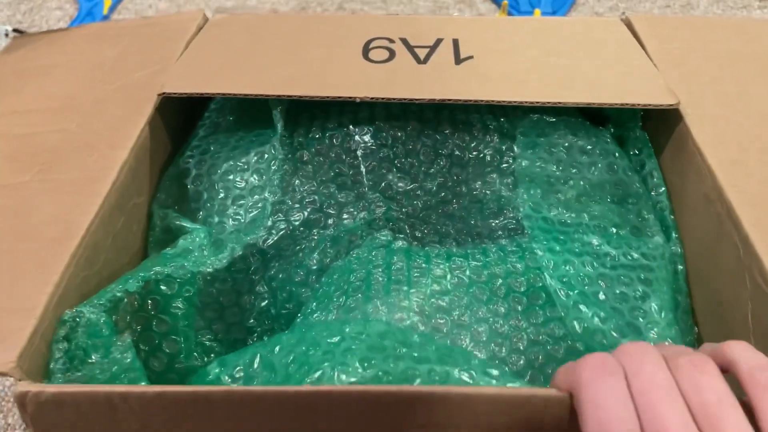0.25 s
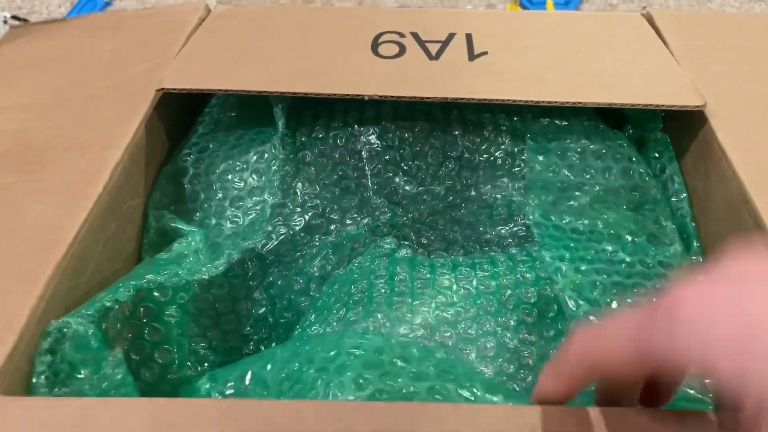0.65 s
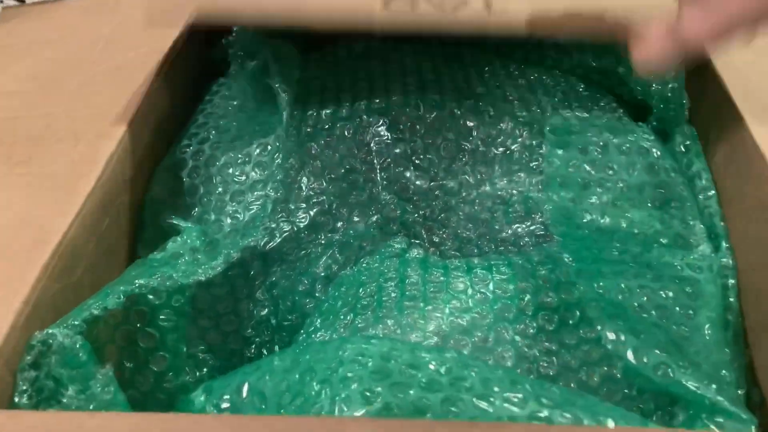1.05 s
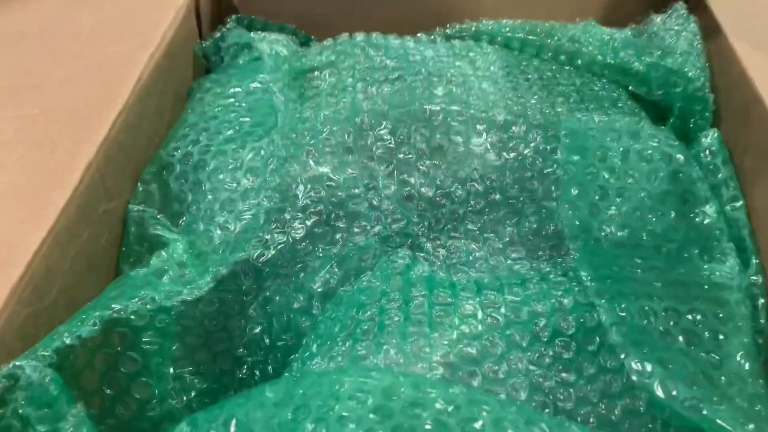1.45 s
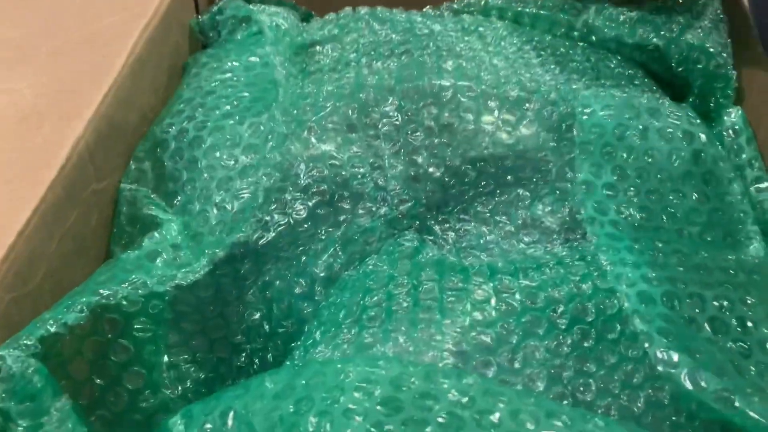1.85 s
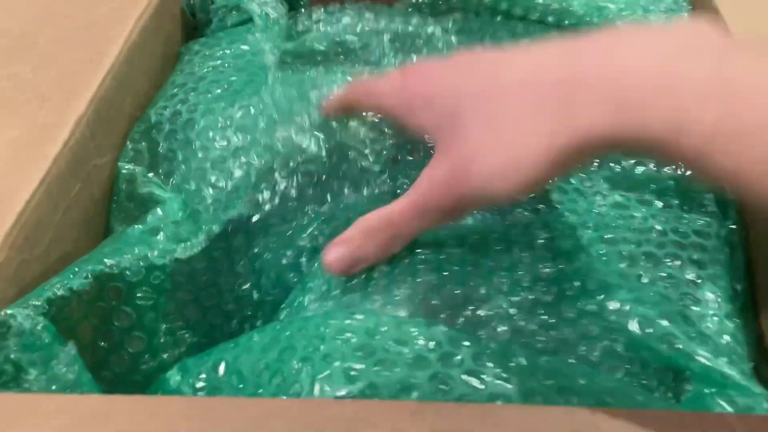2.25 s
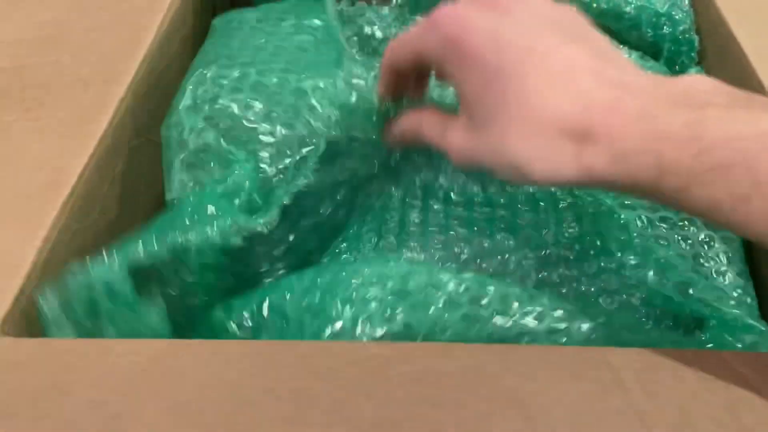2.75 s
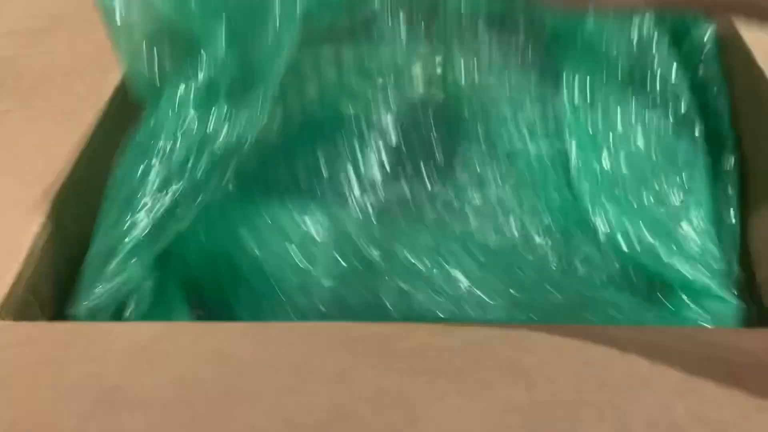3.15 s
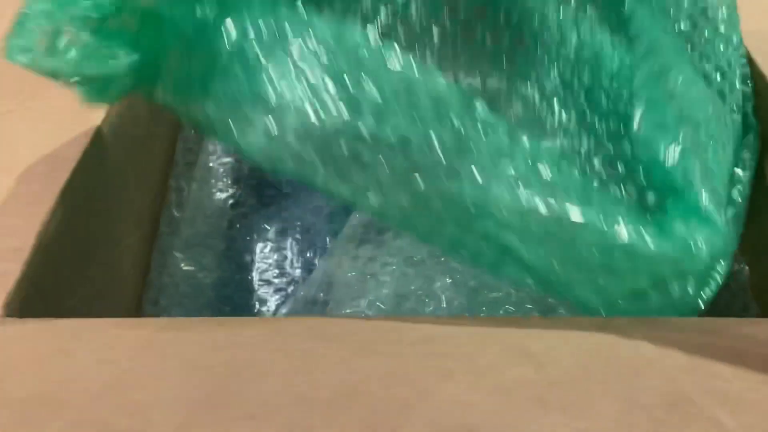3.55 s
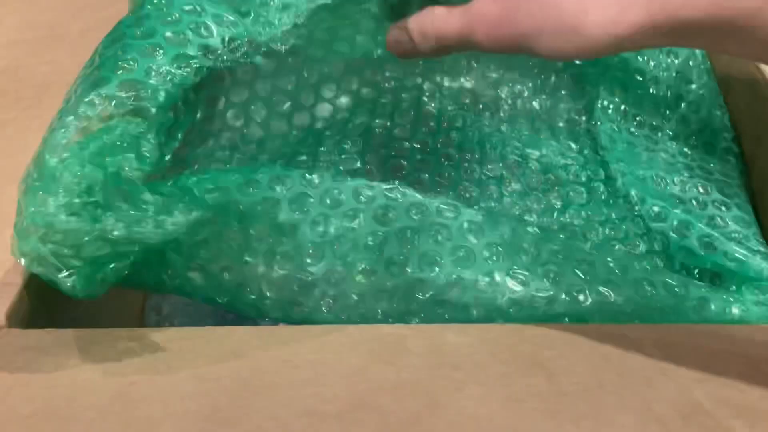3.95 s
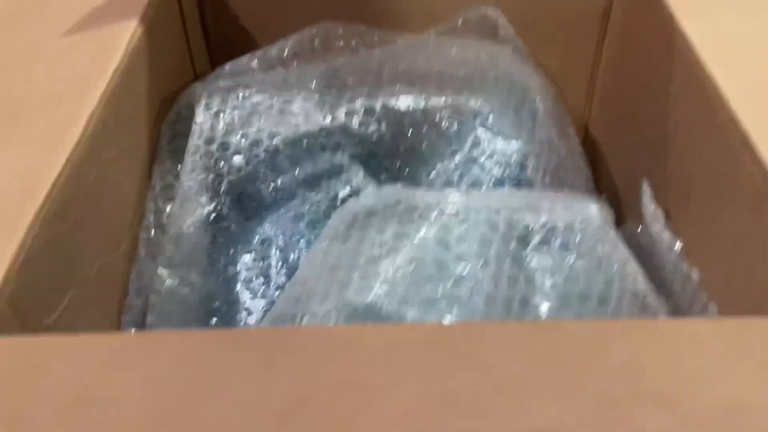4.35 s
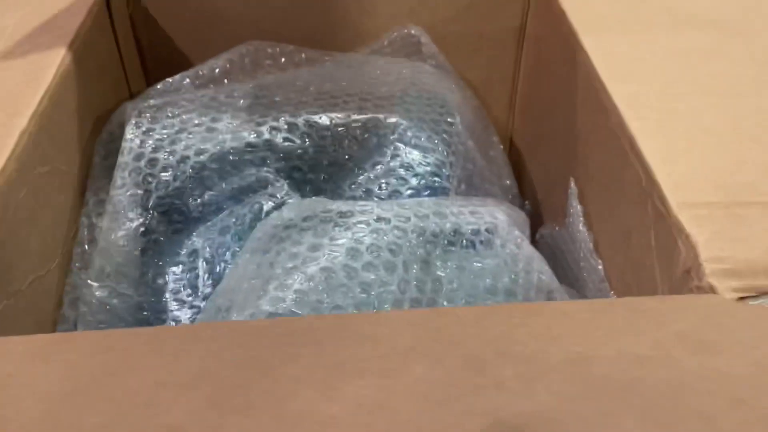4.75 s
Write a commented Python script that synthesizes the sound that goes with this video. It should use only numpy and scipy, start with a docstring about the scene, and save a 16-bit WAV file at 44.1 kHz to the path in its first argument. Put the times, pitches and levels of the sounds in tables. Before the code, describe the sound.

Bubble wrap crackles lightly in a box, a cardboard flap thuds and scrapes, then the sheet is dragged out in loud, bright crinkling bursts.

```python
"""A hand nudges bubble wrap, folds back the flap of a cardboard box, drags the sheet out and flings it aside.
First the film ticks and snaps: random clicks through a bank of bands, plus single coloured cracks.
The flap then thuds (struck modes), scrapes (stick-slip clicks) and hisses under the palm (noise).
The drag and the fling are the loudest film; the sheet settles, then a soft blow and scrape of the box follow.
A small, softly furnished room answers throughout; something hums far off."""
import sys
import numpy as np
from scipy import signal
from scipy.fft import rfft, irfft
from scipy.io import wavfile
from scipy.ndimage import uniform_filter1d

SR = 44100
rng = np.random.default_rng(int(sys.argv[2]) if len(sys.argv) > 2 else 0)


def master(y):
    """Save y as 16-bit WAV."""
    cut = np.clip(np.atleast_2d(y).T, -1, 1)
    pcm = np.round(cut * 32767)  # scale
    wavfile.write(sys.argv[1], SR, pcm.astype(np.int16))


N = 221161
T = np.arange(N) / SR
BANDS_HZ = 2 ** np.arange(5.25, 14.1, 1 / 3)

# room air, relative spectrum: (frequency [Hz], density [dB per Hz])
ROOM_SPECTRUM = [(30, -25), (60, -2), (120, -3), (200, -10), (400, -37), (1000, -18), (4000, -18),
                 (16000, -30)]
# film clicks, relative spectrum: (frequency [Hz], density [dB per Hz])
FILM_SPECTRUM = [(30, -21), (60, -6.5), (110, 5.5), (170, -5), (260, 4), (340, -6), (500, 0.5), (760, -4),
                 (1230, 1), (1750, -2), (3600, -3), (9000, -8.5), (12500, -14.5), (16000, -16)]
# rubbing card, relative spectrum: (frequency [Hz], density [dB per Hz])
CARD_SPECTRUM = [(30, -21), (65, 2.5), (180, -7), (260, 7.5), (350, 0), (750, 2), (1300, -3), (1900, -20),
                 (5000, -20), (12000, -30)]
# palm hiss, relative spectrum: (frequency [Hz], density [dB per Hz])
PALM_SPECTRUM = [(600, -7), (1200, -5), (1800, -10), (2600, 2), (3400, -6.5), (4400, -2), (5600, -3),
                 (7000, -3), (10000, -2), (14500, -1.5), (16000, -2)]
# modes of box and flap: (nominal frequency [Hz], relative level [dB], t60 [s])
BOX_MODES = [(66.4, -21, 0.14), (105, -8.5, 0.11), (223, 1.5, 0.052), (321.3, 1.5, 0.13), (368, 1, 0.052),
             (420, 1.5, 0.056), (495.6, 2.5, 0.039), (576.6, 5.5, 0.093), (699.7, -11, 0.035),
             (752, -1, 0.073), (870, 5.5, 0.043), (1200, 9, 0.065), (1430, 11, 0.035)]
# blows on the box: (time [s], dry peak [dB], contact, at least 0.0002 in use [s])
BLOW_EVENTS = [(0.321, -37, 0.0056), (.432, -41.5, 0.006), (0.986, -36, 0.0082), (1.054, -29, 0.014),
               (1.067, -38, 0.0018), (1.08, -38, 0.0022), (1.372, -27, 0.0026), (1.3873, -14.5, 0.001),
               (1.423, -28.5, 0.00095), (1.491, -38, 0.0017), (1.8393, -38, 0.0001),
               (1.987, -38.5, 0.00041), (2.022, -35.5, 0.00094), (2.106, -43, 0.00025),
               (4.837, -64, 0.0096)]
# card rubbing on card: (time [s], held [s], level [dB], panel rumble before its boost [dB re level])
SCRAPE_STROKES = [(.985, 0.014, -54, 9), (1.057, 0.011, -45, 1), (1.11, .25, -66.5, 11.5),
                  (1.39, 0.034, -41.5, -2), (1.48, 0.097, -53, 7.5), (1.609, 0.054, -40.5, -5),
                  (1.894, 0.048, -46, 1), (1.97, 0.017, -51, -4), (2.027, 0.0085, -53, -5),
                  (2.068, 0.0069, -50, 3), (2.11, 0.017, -53, -17), (4.78, .012, -55, -7),
                  (4.825, 0.022, -68.5, 19)]
# palm sliding along the flap: (time [s], held [s], level [dB])
PALM_STROKES = [(1.045, 0.376, -54), (1.065, 0.0095, -54)]
# creases snapping at set times: (time [s], dry peak [dB], pitch [Hz], width, half the 1/e distance [octaves])
SNAP_EVENTS = [(0.1387, -32.5, 6300, 1.1), (0.2486, -31, 3150, 0.6), (0.4384, -28, 4800, .9),
               (0.4792, -16.5, 1830, 0.67), (0.496, -20.5, 3993, 0.76), (0.6635, -28, 4500, 1.7),
               (0.7638, -33.5, 5300, 0.96), (0.8361, -38.5, 4930, 0.82), (0.8705, -38, 3095, .56),
               (0.8904, -40.5, 4010, 0.4), (1.073, -32.5, 1950, 0.72), (1.3862, -18.5, 2600, 0.45),
               (1.3888, -17, 2940, 0.32), (1.4269, -32, 2890, 2.15), (1.4843, -28, 4700, 0.89),
               (1.561, -27.5, 5100, 0.59), (1.6005, -27.5, 2213, 1.08), (1.6549, -18, 3600, 1.2),
               (1.6714, -16.5, 7000, 0.92), (1.7457, -37, 8300, 0.29), (1.838, -17.5, 8690, 0.65),
               (1.9529, -30.5, 3886, 0.85), (1.971, -33, 3530, 0.77), (2.0245, -30.5, 3600, 0.61),
               (2.0315, -32.5, 3600, 0.74), (2.1062, -28, 4673, 1.3), (2.125, -36, 2804, 0.52),
               (2.1685, -27, 4700, 1), (2.4415, -17, 4470, 1.4), (2.971, -18, 6301, 0.72),
               (3.208, -17.5, 5609, .64), (3.3354, -26.5, 3000, 0.32), (3.386, -23, 3804, 1.36),
               (3.417, -17, 5647, 0.54), (3.4319, -14.5, 6800, 0.54), (3.4744, -17, 4596, 0.59),
               (3.9936, -22, 3379, 0.94), (4.06, -11, 7400, 0.41)]
# pushes and tugs on the film, from the first nudges through the fling to the sheet settling;
# levels precede the gains in wrap():
# (time [s], held [s], level [dB], flapping bass [dB re level], sharp treble [dB re level])
FILM_TUGS = [(0.0, .04, -53, -5.5, -3), (0.08, 0.16, -57, -6.5, -5), (0.25, 0.25, -52, -7.5, -5),
             (0.32, .02, -48, -12, -10), (0.49, 0.018, -43.5, -3.5, -12), (0.555, 0.11, -45, -13, -7),
             (0.88, 0.16, -65, -4, -10), (1.39, .015, -44, -3, -28), (1.489, 0.11, -56, -8, -3),
             (1.655, 0.0079, -43, -7, -5.5), (1.89, 0.18, -57.5, -10, -1), (2.182, 0.028, -46, -5, 1.5),
             (2.227, .04, -36.5, -7, -2.5), (2.345, 0.65, -42, -8, -3.5), (2.4, 0.047, -37.5, -5, -2.5),
             (2.77, .12, -42, -15, -3), (2.96, 0.073, -48, -12, -1.5), (3.06, .2, -39, -8.5, -2),
             (3.125, 0.061, -35.5, -18, -7.5), (3.33, .1, -50, -8.5, -5), (3.49, 0.2, -47.5, -7.5, -6.5),
             (3.41, 0.023, -40, -9.5, -4), (3.58, 0.045, -40, -13.5, -5), (3.78, 0.021, -35, -17, -9.5),
             (3.825, 0.069, -39.5, -13.5, -7), (4.005, .05, -36.5, -13, -0.5), (4.092, .006, -14.5, -8, -4),
             (4.25, .13, -47, -9, -4), (4.33, 0.0084, -40.5, -7.5, -9), (4.5, 0.49, -63, -18.5, -5.5)]

ROOM_DB, HUM_HZ, HUM_PEAK_DB = -65.5, 119.6, -64.5
CARD_RISE_DB_PER_S, CARD_STOP_DB_PER_S = 744, 450
FILM_RISE_DB_PER_S, FILM_SETTLE_DB_PER_S = 600, 205  # tightens quickly, relaxes slowly
SAG_DB_PER_S = 5  # each push eases off while held
BILLOW_LAG_S = 0.0056  # the whole sheet flaps just after its creases move
SHIVER_T60_S = 0.012
# snaps at random times
STRAY_PER_S, STRAY_HZ, STRAY_SCATTER_OCTAVES, STRAY_WIDTH_OCTAVES = 28, 4480, 0.51, 0.84
# peak with the film at -40 dB, its scatter, and how far it follows the film
STRAY_DB, STRAY_SPREAD_DB, STRAY_FOLLOW_DB_PER_DB = -26, 1.5, 0.78
TOP_HZ = 16100


def undb(db):
    """Decibels to gain."""
    return 10 ** (np.asarray(db) / 20)


def colour(spectrum, hz):
    """Gain of a spectrum, interpolated in dB over log frequency."""
    f, db = np.transpose(spectrum)
    return undb(np.interp(np.log(hz + 1), np.log(f), db))


def band(x, lo_hz, hi_hz):
    """Causal band-pass."""
    return signal.sosfilt(signal.butter(2, [lo_hz, hi_hz], "band", fs=SR, output="sos"), x + 1e-18)


def noise(spectrum):
    """Noise of rms 1 with the given spectrum."""
    size = 2 ** 18
    gain = colour(spectrum, np.fft.rfftfreq(size, 1 / SR))
    x = irfft(rfft(rng.standard_normal(size)) * gain)[:N]
    return x / x.std()


def walk(rate_hz):
    """Continuous random drift of spread near 1, with a new target rate_hz times a second."""
    return 1.2 * np.interp(T * rate_hz, np.arange(4096), rng.standard_normal(4096))


def stroke(s, held_s, rise_db_per_s, fall_db_per_s):
    """Gain of one hand movement: builds up to time s, sags while held, then dies away."""
    early = np.maximum(s - T, 0)
    late = np.maximum(T - s - held_s, 0)
    sag_db = SAG_DB_PER_S * np.clip(T - s, 0, held_s)
    return undb(-rise_db_per_s * early - sag_db - fall_db_per_s * late)


def crackle(rate_per_s, spread_db, tint_db, spectrum, steady_s):
    """Random clicks, few large and many small, each with its own mix of bands; a row a band, total rms 1."""
    at = np.flatnonzero(rng.random(N) < rate_per_s / SR)
    size = undb(spread_db * np.minimum(rng.exponential(size=N)[at], 4.6))
    # motion sets the energy over a short stretch, however it splits into clicks
    energy = uniform_filter1d(np.bincount(at, size ** 2, N), int(steady_s * SR))
    size = size / np.sqrt(energy[at])
    weight = colour(spectrum, BANDS_HZ) * np.sqrt(BANDS_HZ)
    rows = []
    for hz, gain in zip(BANDS_HZ, weight / np.linalg.norm(weight)):
        tint, sign = rng.standard_normal((N // 2, 2))[:len(at)].T
        clicks = np.bincount(at, size * np.sign(sign) * undb(tint_db * tint), N)
        ring = band(clicks, hz / 1.17, hz * 1.17)
        rows.append(gain * ring / ring.std())
    return np.array(rows)


def room_tone():
    """Quiet air noise and a distant mains hum, one sine."""
    hum = undb(HUM_PEAK_DB) * np.sin(2 * np.pi * HUM_HZ * T)
    return undb(ROOM_DB) * noise(ROOM_SPECTRUM) + hum


def echoes(x, t60_s, wet_db, gap_s, dull_hz):
    """Direct sound plus a dense, decaying noise tail of reflections, dulled by a one-pole low-pass."""
    t = T[:SR // 2]
    tail = rng.standard_normal(len(t)) * 1000 ** (-t / t60_s) * (t > gap_s)
    pole = np.exp(-2 * np.pi * dull_hz / SR)
    tail = signal.lfilter([1 - pole], [1, -pole], tail / np.linalg.norm(tail))
    return x + undb(wet_db) * signal.fftconvolve(x, tail)[:N]


def box_ring():
    """The panels' answer to a tap: decaying modes, slightly detuned, neighbours in opposite directions."""
    t = T[:SR // 3]
    ring = np.zeros(len(t))
    for k, (hz, db, t60_s) in enumerate(BOX_MODES):
        detuned_hz = hz * (1 + 0.02 * rng.standard_normal())
        decay = np.exp(-np.log(1000) * t / t60_s)
        ring += (-1) ** k * undb(db) * np.sin(2 * np.pi * detuned_hz * t) * decay
    return ring


def blows():
    """Each blow is a smooth push on the panels; long, soft ones reach only the low modes."""
    out, t = np.zeros(N + SR), T[:SR // 3]
    for s, db, contact_s in BLOW_EVENTS:
        push = np.sin(np.pi * np.minimum(t / max(contact_s, 0.0002), 1)) ** 2
        thud = signal.fftconvolve(box_ring(), push)[:len(t)]
        i = int(s * SR)
        out[i:i + len(t)] += undb(db) * thud / abs(thud).max()
    return out[:N]


def cardboard():
    """The flap sticks and slips against its neighbours; the wide panels rumble and ring hollow."""
    slips = crackle(900, spread_db=4.5, tint_db=-1.5, spectrum=CARD_SPECTRUM, steady_s=0.23)
    low = np.clip(np.log2(300 / BANDS_HZ), 0, 1)
    rasp, rumble = (1 - low) @ slips, low @ slips
    rub = np.zeros(N)
    for s, held_s, db, rumble_db in SCRAPE_STROKES:
        gain = undb(db) * stroke(s, held_s, CARD_RISE_DB_PER_S, CARD_STOP_DB_PER_S)
        rub += gain * (rasp + undb(rumble_db + 7.0) * rumble)
    hollow = signal.fftconvolve(rub, box_ring())[:N]
    return rub + undb(-14) * hollow * rub.std() / hollow.std()


def palm():
    """Skin on smooth card: a fine hiss whose level and top waver."""
    hiss = noise(PALM_SPECTRUM)
    hiss = hiss + 0.13 * walk(25.0) * band(hiss, 6000, 16000)
    pressure = np.zeros(N)
    for s, held_s, db in PALM_STROKES:
        pressure += undb(db) * stroke(s, held_s, CARD_RISE_DB_PER_S, CARD_STOP_DB_PER_S)
    return hiss * pressure * undb(0.94 * walk(41.05))


def film_motion():
    """Overlapping tugs add in power: gains of the film's body, bass and treble."""
    power = np.full((3, N), 1e-12)
    for s, held_s, db, bass_db, treble_db in FILM_TUGS:
        tug = stroke(s, held_s, FILM_RISE_DB_PER_S, FILM_SETTLE_DB_PER_S)
        power += np.outer(undb([db, db + bass_db, db + treble_db]) ** 2, tug ** 2)
    body, bass, treble = np.sqrt(power)
    return body, np.interp(T - BILLOW_LAG_S, T, bass), treble


def stray_snaps(body):
    """Further creases flip at random times, harder while the film moves: rows like SNAP_EVENTS."""
    gap, size, pitch = rng.standard_normal((256, 3)).T
    times = np.cumsum(gap ** 2) / STRAY_PER_S
    motion_db = 20 * np.log10(np.interp(times, T, body)) + 40  # re -40 dB
    levels_db = STRAY_DB + STRAY_FOLLOW_DB_PER_DB * motion_db + STRAY_SPREAD_DB * size
    pitches_hz = STRAY_HZ * 2 ** (STRAY_SCATTER_OCTAVES * pitch)
    rows = zip(times, levels_db, pitches_hz)
    return [(s, db, hz, STRAY_WIDTH_OCTAVES) for s, db, hz in rows if s < T[-1]]


def snaps(body):
    """A crease flips: one sharp crack around its own pitch, then the nearby film shivers briefly."""
    out, t = np.zeros(N + SR), T[:4096]
    f = np.fft.rfftfreq(len(t), 1 / SR) + 1
    rows = SNAP_EVENTS + stray_snaps(body)
    shivers = rng.standard_normal((320, len(t)))
    for (s, db, hz, octaves), shiver in zip(rows, shivers):
        hump = np.exp(-(np.log2(f / hz) / (2 * octaves)) ** 2) * np.sqrt(hz / f) + undb(-19)
        # minimum phase: the energy comes at the start
        cepstrum = irfft(np.log(hump))[:len(t) // 2]
        response = np.exp(rfft(2 * cepstrum, len(t)))
        push = 0.3 * shiver * np.exp(-np.log(1000) * t / SHIVER_T60_S)
        push[0] = 1
        crack = irfft(rfft(push) * response)
        i = int(s * SR)
        out[i:i + len(t)] += undb(db) * crack / abs(crack).max()
    return out[:N]


def wrap(body, bass, treble):
    """Faster motion rubs more bubbles a second; billowing adds bass, taut film adds treble."""
    rate_per_s = np.clip(8000 * (body / undb(-40)) ** 0.7, 500, SR / 2)
    fine = crackle(rate_per_s, spread_db=2.5, tint_db=4.5, spectrum=FILM_SPECTRUM, steady_s=0.027)
    # whole bubble walls buckle with coarser ticks
    coarse = crackle(170, spread_db=5.0, tint_db=4.5, spectrum=FILM_SPECTRUM, steady_s=0.14)
    clicks = fine + undb(-10.0) * coarse
    # folds form and open, each favouring its own pitch for a moment
    clicks = np.array([row * undb(2.38 * walk(45)) for row in clicks])
    low = np.clip(np.log2(900 / BANDS_HZ), 0, 1)
    high = np.clip(np.log2(BANDS_HZ / 4500), 0, 1)
    sheet = body * ((1 - low - high) @ clicks)
    sheet += undb(8.5) * bass * (low @ clicks)
    sheet += undb(5.0) * treble * (high @ clicks)
    return sheet * undb(1.5)


def scene():
    """Film, box and hand together in a small room."""
    body, bass, treble = film_motion()
    near = wrap(body, bass, treble) + blows() + cardboard() + palm() + snaps(body)
    wet = echoes(near, t60_s=0.32, wet_db=-20.5, gap_s=0.012, dull_hz=7000)
    return (wet + room_tone())[None]


def record(dry):
    """The microphone drops the deep bass, rounds the highest peaks and cuts the top."""
    x = signal.sosfilt(signal.butter(4, 38, "high", fs=SR, output="sos"), dry)
    top_cut = signal.ellip(10, 0.2, 70, TOP_HZ, fs=SR, output="sos")
    return signal.sosfilt(top_cut, np.tanh(x))


dry = scene()
out = record(dry)
master(out)
```